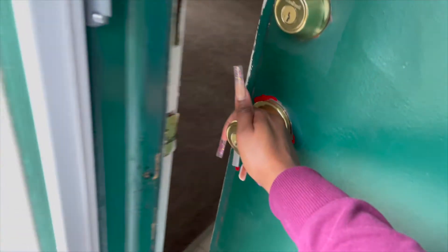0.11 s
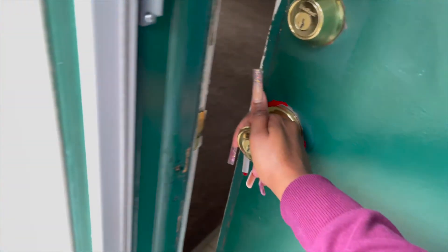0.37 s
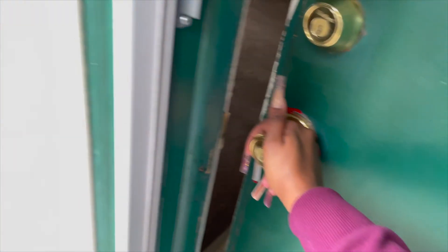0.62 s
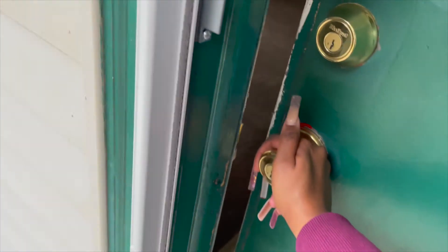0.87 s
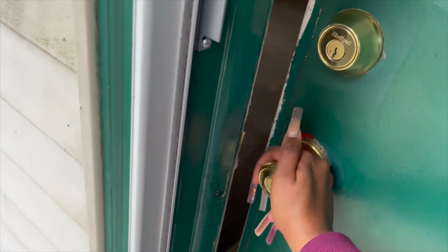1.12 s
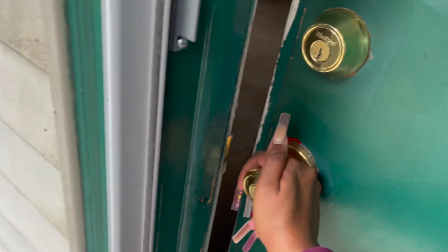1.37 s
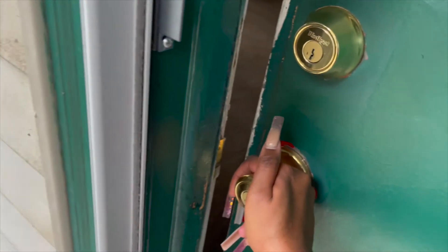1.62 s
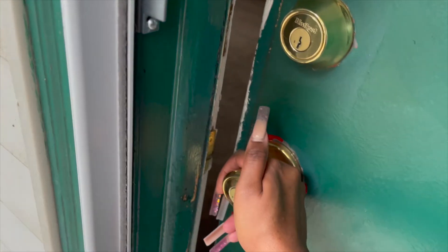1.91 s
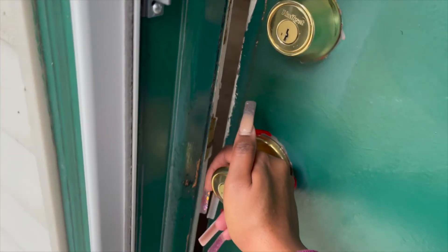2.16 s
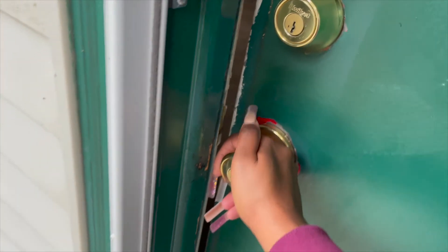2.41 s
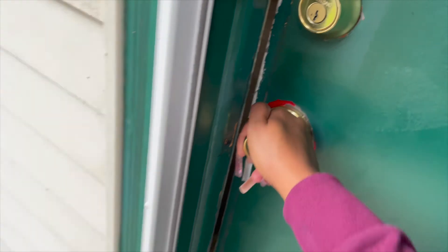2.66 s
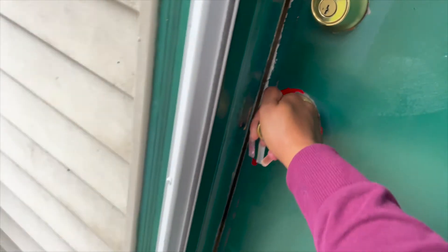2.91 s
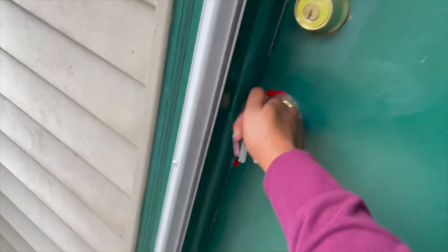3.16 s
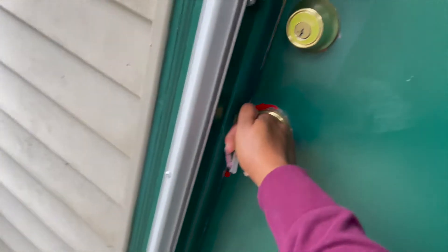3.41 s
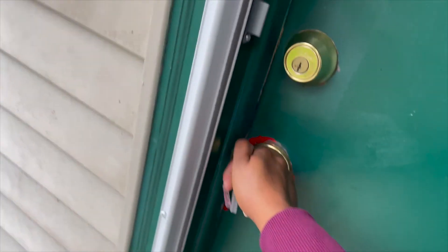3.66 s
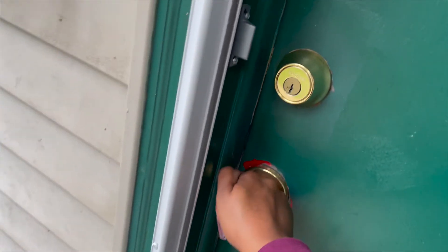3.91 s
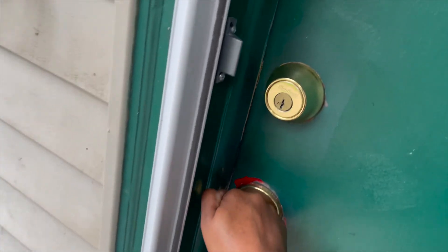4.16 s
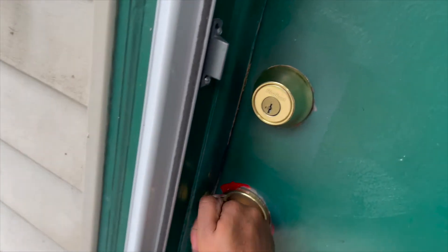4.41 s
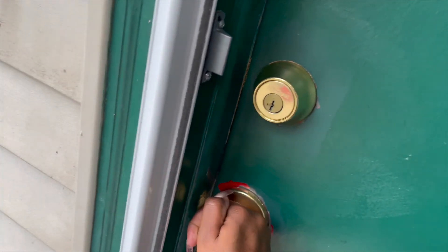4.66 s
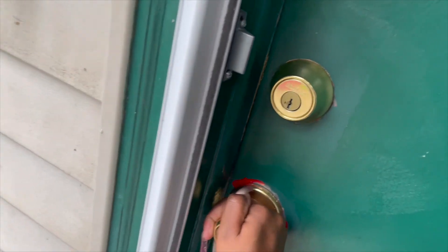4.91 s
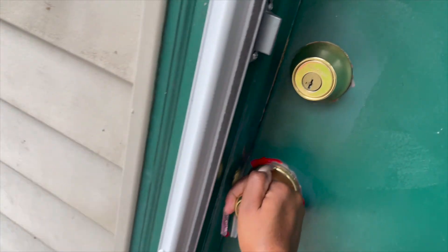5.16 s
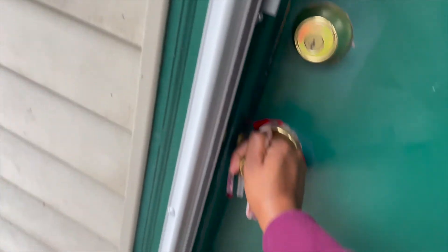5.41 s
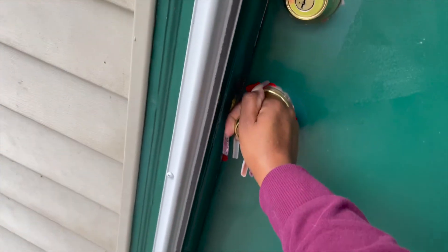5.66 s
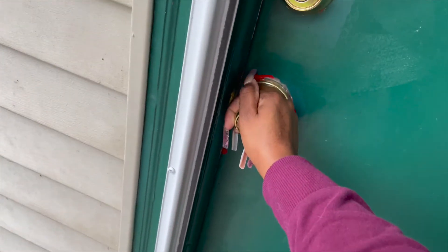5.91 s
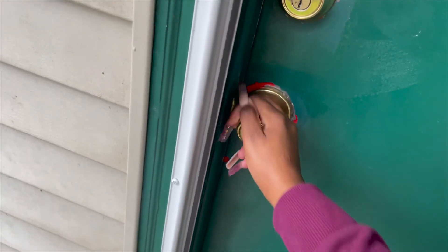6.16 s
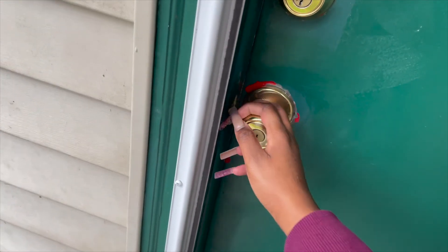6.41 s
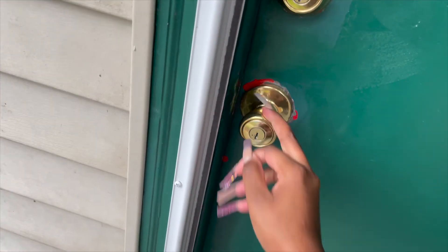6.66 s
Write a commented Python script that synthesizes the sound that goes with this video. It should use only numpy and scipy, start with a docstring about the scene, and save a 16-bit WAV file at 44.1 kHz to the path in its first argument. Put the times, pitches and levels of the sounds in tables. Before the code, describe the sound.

A front door creeps nearly shut with faint taps, slams with one heavy booming thud and metallic clack, then its loose knob rattles and clicks.

```python
"""On a porch by a quiet street, a hand pulls a front door shut by its loose brass knob, heard close by.
Slab, panel, knob and brass are modal bodies: noise shaped by contact and rubbing forces excites them.
Dying low sines are the booms of the slab, gliding sines a hinge squeak and low moans,
and filtered noise the street; a pair of phone microphones shares its treble."""
import sys
import numpy as np
from scipy import signal
from scipy.io import wavfile

SR = 44100
rng = np.random.default_rng(int(sys.argv[2]) if len(sys.argv) > 2 else 0)


def magnitude_from_level(level_db):
    """Linear magnitude for a level in decibels (20 dB per decade)."""
    exponent = np.asarray(level_db, float) / 20
    return 10 ** exponent


def persist_wave(psi):
    """Save psi, clipped to +-1, as 16-bit WAV."""
    counts = np.round(np.clip(psi, -1, 1) * 32767).astype(np.int16)
    wavfile.write(sys.argv[1], SR, np.atleast_2d(counts).T)


N = 299880

# Levels are in dB; the door's parts and booms add gains of their own.
# Traffic rumble. Each row: time in seconds, level in dB.
TRAFFIC_RUMBLE = [(0, -46), (.9, -44), (1.5, -48), (1.76, -44.5), (2.1, -45.5), (3.6, -37.5), (4.0, -41),
                  (4.75, -43), (5.04, -34.5), (5.3, -47.5), (6.5, -44.5), (6.8, -43)]
# Steady street spectrum. Each row: frequency in Hz, level in dB per Hz.
STREET_SPECTRUM = [(95, -82.5), (134, -68.5), (185, -86), (238, -74), (356, -79), (546, -79), (640, -91.5),
                   (750, -87), (1200, -100), (1700, -104.5), (2800, -107.5), (3700, -109), (4600, -107),
                   (5800, -104)]
# Left-right correlation of the street. Each row: frequency in Hz, likeness from -1 to 1.
STREET_LIKENESS = [(40, 0.99), (110, 0.71), (210, 0.43), (400, -0.63), (1000, -0.34)]
# Low gliding tones. Each row: start in seconds, length in seconds, pitch in Hz,
# pitch factor at mid-way, level in dB.
LOW_MOANS = [(4.36, 0.362, 157, 1.38, -50.5), (5.449, 0.41, 126, 1.3, -49.5)]
# Hinge squeak. One row: start in seconds, length in seconds, pitch in Hz, pitch factor at mid-way, level in dB.
HINGE_SQUEAK = (1.12, .25, 1695, 1.006, -75)
# Lowest swings of the slab and the air behind it. Each row: start in seconds, level in dB,
# frequency in Hz, 60 dB decay time in seconds.
SLAB_BOOMS = [(.0, -33.5, 70.3, 0.19), (0.149, -37, 74, 0.14), (0.209, -29, 71.9, 0.31),
              (2.172, -21.5, 33.2, 0.28), (2.211, -14, 33.77, 0.64), (2.212, -25.5, 66.2, 0.98),
              (2.347, -17.5, 37.1, 0.52), (2.402, -20, 28.2, 0.54), (2.913, -15.5, 36.9, 0.54),
              (2.968, -8.5, 42.3, 0.036), (3.013, -15.5, 33.9, 0.35), (3.117, -0.5, 46.3, 0.37),
              (3.141, -16.5, 92.5, 0.52), (3.201, -5.5, 28.23, 0.6), (3.241, -15.5, 57, 0.55),
              (3.274, -20, 25.3, 0.96), (3.371, -22, 29.3, 1.18), (3.50, -20, 34, 0.36),
              (6.531, -23.5, 54.4, 0.21)]
# Strokes of hand, seal and latch. Each row: start in seconds, length in seconds, level on the knob in dB,
# panel above knob in dB, brass above knob in dB.
RUB_STROKES = [(0, 0.063, -61.5, 0, -0.5), (1.566, 0.21, -70, 13.5, -7.5), (1.802, 0.11, -61, 6.5, -21),
               (1.96, 0.095, -65, 10, -3.5), (2.792, 0.17, -74.5, 8, -3), (2.922, 0.096, -69, 15, -3),
               (2.989, 0.1, -57.5, 8.5, 2), (3.093, 0.14, -42, 11, -1), (3.499, 0.16, -72.5, 16, -17),
               (3.852, 0.13, -74, -5, -0.5), (4.198, 0.25, -75, 9, -2), (4.4, 0.061, -60, 4, -24),
               (4.51, 0.1, -70.5, 11, -15), (4.677, 0.095, -68, 4.5, -6.5), (4.967, 0.035, -66.5, 0, -24),
               (5.274, .1, -70.5, 5, -8), (5.377, .11, -60.5, 4.5, -6.5), (5.716, .06, -59, -1, -3),
               (5.751, 0.13, -54, 8.5, 0), (5.877, 0.087, -61.5, 10.5, -3), (6.078, 0.16, -67, 8, -4),
               (6.203, 0.11, -63, 4, -5.5), (6.322, 0.083, -74, 5, 3.5), (6.499, 0.04, -62.5, 9.5, 0),
               (6.66, 0.051, -59.5, -18, -9)]
# Knocks of the slab on its frame. Each row: time in seconds, peak level in dB, ring in Hz,
# 60 dB decay time of the rattling tail in seconds.
FRAME_KNOCKS = [(0.151, -26.5, 156, 0.055), (0.16, -37, 200, .15), (0.166, -29, 285, 0.17),
                (0.623, -32.5, 220, 0.39), (0.967, -41, 136, 0.12), (2.162, -32.5, 300, 0.16),
                (2.201, -27.5, 139, 0.39), (2.274, -34.5, 254, .12), (3.033, -16.5, 428, 0.26),
                (3.094, -13, 300, .15), (3.114, -11, 343, 0.4), (3.151, -4, 332, 0.12),
                (3.16, -4.5, 195, 0.16), (3.176, -11, 175, 0.096), (3.183, -8.5, 124, 0.077),
                (3.244, -14.5, 191, 1), (3.752, -34.5, 326, 0.4), (3.789, -43, 214, .15),
                (4.282, -37, 200, 0.56), (4.504, -32, 307, .15), (4.885, -35.5, 286, .12),
                (5.902, -35, 273, .13), (6.501, -36.5, 200, 0.18), (6.531, -32, 130, 0.17)]
# Contacts of knob, latch and frame. Each row: time in seconds, peak level on the knob in dB,
# panel above knob in dB, brass above knob in dB.
LATCH_CONTACTS = [(0.15, -57, 12, 8), (0.624, -51, 21, -9), (0.658, -51, 11, 1), (2.131, -57, 10.5, -6),
                  (2.159, -38, 7, -15), (2.2, -42.5, 9.5, 0.5), (2.279, -38.5, 6, -14.5),
                  (2.309, -46, 5.5, -1), (2.552, -49, 1.5, -9.5), (2.887, -31.5, -4.5, -0.5),
                  (2.929, -44, -12, -30), (3.033, -13.5, 1, 3), (3.042, -16.5, 2.5, -6.5),
                  (3.164, -14, 3, 0), (3.174, -14.5, 6, 1), (3.188, -13, 0.5, -16), (3.197, -15, -7.5, -5),
                  (3.213, -17.5, 7.5, -9), (3.241, -21, -7.5, -10.5), (3.311, -35, 7.5, -7),
                  (3.335, -34, 14.5, -18.5), (3.356, -34.5, 0, -6.5), (3.422, -43, 3, 4.5),
                  (3.512, -49.5, 4, -8), (3.526, -40, -4, -25), (3.548, -57, 17, -15),
                  (3.605, -41, -4, -12.5), (3.731, -47, 5.5, 5), (3.757, -36, 9.5, -4.5),
                  (3.78, -46, -10, -2), (4.19, -56.5, 4, 0.5), (4.284, -57.5, 22, 4), (4.407, -43.5, 14, 1),
                  (4.503, -35, 0.5, -5.5), (4.612, -36, 4, -23), (4.644, -32.5, -10, -16),
                  (4.8, -55, 0.5, -17), (4.88, -36, 2, -37), (4.915, -58, 11, -13), (4.942, -44, 3.5, -14),
                  (5.014, -48, 1.5, -23.5), (5.225, -46, -2, -13), (5.652, -59, 8.5, -16),
                  (5.706, -41.5, 0, 0.5), (5.904, -47.5, 8, -17), (5.955, -40.5, 13, 0),
                  (6.036, -52.5, 14.5, 0.5), (6.198, -31, -1, -6.5), (6.41, -47.5, 1, -11),
                  (6.453, -49, 13, -18), (6.501, -40, 5, -0.5), (6.522, -58, 32.5, 18), (6.532, -55, 19, 5),
                  (6.673, -35.5, -20, -16), (6.69, -23.5, -7.5, 12.5), (6.699, -26, -16, 11.5)]
# Ringing modes of the four parts. Each row: frequency in Hz, width in Hz (held to 8-400), level in dB.
SLAB_MODES = [(135.4, 8.7, 10.5), (201.9, 7.9, 6.5), (258, 21, -5), (333.6, 5.3, -2), (385, 6, -14.5),
              (520, 13, -8)]
PANEL_MODES = [(721, 39, -5), (837, 11, -16.5), (927, 11, -8), (1036, 32, -11), (1135, 130, -3.5),
               (1305, 59, -2)]
KNOB_MODES = [(1770, 19, -0.5), (2258, 140, -7.5), (4070, 130, 2)]
BRASS_MODES = [(4427, 590, 2.5), (5427, 535, 3.5), (5060, 36, 4), (5500, 32, -17), (8180, 73, -1.5)]
# Pitches at which loose parts ring. Each entry: frequency in Hz.
LOOSE_PANEL_HZ = [878.5, 1015, 1148, 1290]
LOOSE_KNOB_HZ = [1986, 2272, 2490, 2890, 3770]
LOOSE_BRASS_HZ = [4543, 4740, 5400, 5630]
# Resonances of both microphone ports. Each row: frequency in Hz, width in Hz, lift in dB.
PORT_RESONANCES = [(3576, 1100, -3), (5060, 370, 3.5)]
# Further resonances of the left port. Each row: frequency in Hz, width in Hz, lift in dB.
LEFT_RESONANCES = [(990, 655, 5), (2960, 1010, 5)]

# A stroke's edges change by 10 dB in these times; the exponent below 1 puts its swell before the middle.
RUB_RISE_S, RUB_FALL_S, RUB_SWELL_DB, RUB_EARLY = 0.028, 0.03, 6, 0.71
TOUCH_S = 0.002  # build-up of a contact
RATTLE_T60_S = 0.11  # reference decay of the rattling tail, scaled for each part
# Reference shaking relative to the peak; the parts scale both, and CHATTER_DB makes it uneven.
SHAKE_DB, SHAKE_T60_S, CHATTER_DB = -9.5, 0.22, 3
SHAKE_FAINTER, SHAKE_LONGER = 0.25, 0.24  # a harder blow shakes relatively fainter but longer (dB per dB)
HISS_GROWTH = 0.25  # extra level of the hiss above 6.5 kHz (dB per dB of envelope)
LOOSE_SPREAD_DB = 4.5  # a blow catches each loose part more or less
SHARED_HZ, LAG_SAMPLES = 4330, 26  # shared treble: lower limit, delay on the left


def rms_one(x):
    """Normalization: the root mean square becomes 1."""
    return x / np.sqrt(np.mean(x ** 2) + 1e-20)


def at_hz(points, hz):
    """Linear interpolation of a spectrum along log frequency."""
    table_hz, values = np.transpose(points)
    return np.interp(np.log(hz), np.log(table_hz), values)


def cut(x, hz, kind, order=2):
    """Butterworth filtering: maximally flat passband."""
    return signal.sosfilt(signal.butter(order, hz, kind, fs=SR, output="sos"), x)


def resonance(x, hz, width_hz):
    """Damped resonator: a two-pole band-pass with gain 1 at its peak."""
    r = np.exp(-np.pi * width_hz / SR)
    numerator = [(1 - r * r) / 2, 0, (r * r - 1) / 2]
    return signal.lfilter(numerator, [1, -2 * r * np.cos(2 * np.pi * hz / SR), r * r], x)


def lift(x, resonances):
    """Resonant amplification: each resonance in turn raises or lowers its surroundings."""
    for hz, width_hz, lift_db in resonances:
        x = x + (magnitude_from_level(lift_db) - 1) * resonance(x, hz, width_hz)
    return x


def drift(rate_hz):
    """Random fluctuation: low-passed noise of rms 1, drawn 40 times a second."""
    points = rng.standard_normal(int(N / SR * 40) + 2)
    r = np.exp(-2 * np.pi * rate_hz / 40)
    smooth = rms_one(signal.lfilter([1], [1, -r], points))
    return np.interp(np.arange(N) * 40 / SR, np.arange(len(points)), smooth)


def spread(mid, side, alike):
    """Partial correlation: sum and difference noises are weighted by left-right likeness."""
    return np.sqrt(1 + alike) * mid + np.sqrt(1 - alike) * side * [[1], [-1]]


def stereo(alike, grain_db):
    """Granular noise: uneven grains modulate two partly correlated channels."""
    mid, side = rng.standard_normal((2, N))
    grains = magnitude_from_level(grain_db * np.minimum(rng.exponential(1, N), 4))
    return rms_one(grains * spread(mid, side, alike))


def street():
    """Band-filtered noise: flickering third octaves, the lowest swelling with passing traffic."""
    out, edges = 0, 16 * 2 ** np.arange(0, 9, 1 / 3)
    traffic_db = np.interp(np.arange(N) / SR, *np.transpose(TRAFFIC_RUMBLE))
    white = rng.standard_normal((2, 2, N))  # neighbouring bands take separate noises
    for k, (low, high) in enumerate(zip(edges, edges[1:])):
        mid, side = rms_one(cut(white[k % 2], [low, high], "band"))
        hz = np.sqrt(low * high)
        if hz < 45:
            level_db = traffic_db - 4.0
        elif hz < 95:
            level_db = -52.5 + 0.3 * (traffic_db - traffic_db.mean())
        else:
            level_db = at_hz(STREET_SPECTRUM, hz) + 10 * np.log10(high - low)
        band = spread(mid, side, at_hz(STREET_LIKENESS, hz))
        out = out + magnitude_from_level(level_db + 2.7 * drift(1.8)) * band
    return cut(out, 5420, "low", order=12)


def glide(start, length, hz, rise, level_db):
    """Frequency modulation: a thin tone of wavering level arches in pitch, faded at both ends."""
    t = np.arange(N) / SR - start
    fade = np.clip(np.minimum(t, length - t) / 0.05, 0, 1)
    pitch = hz * rise ** np.sin(np.pi * np.clip(t / length, 0, 1))
    tone = np.sin(2 * np.pi * np.cumsum(pitch) / SR)
    return np.sqrt(2) * fade * magnitude_from_level(level_db + 2.2 * drift(10)) * tone


def hinge_squeak():
    """Tonal squeak: the hinge sounds as a single gliding sine."""
    return glide(*HINGE_SQUEAK)


def moans():
    """Superposition of low gliding tones."""
    return sum(glide(*moan) for moan in LOW_MOANS)


def booms():
    """Damped oscillation: low sines with sharpened crests, arriving at the right port first."""
    out = np.zeros(N)
    for s, level_db, hz, t60 in SLAB_BOOMS:
        t = np.maximum(np.arange(N) / SR - s, 0)
        turn = 2 * np.pi * hz * t
        crest = 0.076 * np.sin(turn / 2) ** 2 * np.sin(2 * turn - 0.8)
        out += magnitude_from_level(level_db - 60 * t / t60) * (np.sin(turn) + crest)
    out = cut(out, 250, "low")
    late = np.interp(np.arange(N) - 0.0012 * SR, np.arange(N), out)
    return np.array([late * magnitude_from_level(0.5), out * magnitude_from_level(3.5)])


def strokes():
    """Stick-slip friction: levels in dB on knob, panel and brass rise, swell and fall unevenly."""
    power, t = np.full((3, N), 1e-12), np.arange(N) / SR
    for start, length, knob_db, panel_db, brass_db in RUB_STROKES:
        edge = np.minimum(0, np.minimum((t - start) / RUB_RISE_S, (start + length - t) / RUB_FALL_S))
        swell = np.sin(np.pi * np.clip((t - start) / length, 0, 1) ** RUB_EARLY)
        part_db = np.array([[0], [panel_db], [brass_db]])
        power += magnitude_from_level(knob_db + 10 * edge + RUB_SWELL_DB * swell + part_db) ** 2
    slips = rms_one(cut(rng.standard_normal(N), [12, 90], "band"))
    return 10 * np.log10(power) + 1.37 * slips


def shake_time(level_db):
    """Level-dependent decay: 60 dB time in seconds, longer after a harder blow."""
    return SHAKE_T60_S * magnitude_from_level(SHAKE_LONGER * (level_db + 42.5))


def force(times, levels_db, t60s, rub_db, crack_s, tail_db, shake_db, shake_t60s):
    """Impact excitation: crack, rattling tail and uneven shaking add in an envelope to the rubbing."""
    power = magnitude_from_level(rub_db) ** 2
    chatter_db = CHATTER_DB * rms_one(cut(rng.standard_normal(N + SR), [15, 120], "band"))
    for s, level_db, t60, shake_t60 in np.broadcast(times, levels_db, t60s, shake_t60s):
        i = round(s * SR)
        t = np.arange(min(N - i, SR)) / SR
        crack = np.exp(-t / crack_s)
        tail = magnitude_from_level(tail_db - 60 * t / np.clip(t60, 0.02, 1))
        start_db = shake_db - SHAKE_FAINTER * (level_db + 41)
        shake = magnitude_from_level(start_db - 60 * t / shake_t60 + chatter_db[i:i + len(t)])
        touch = np.minimum(t / TOUCH_S, 1)
        power[i:i + len(t)] += magnitude_from_level(level_db) ** 2 * ((crack + tail) ** 2 + shake ** 2) * touch ** 2
    return np.sqrt(power)


def click(times, levels_db):
    """Impulse excitation: the first touch of each contact, alike at both ports."""
    out = np.zeros(N)
    out[np.round(times * SR).astype(int)] = magnitude_from_level(levels_db)
    return out


def body(drive, low_hz, high_hz, modes, ring_db):
    """Modal response: a broad band of dense modes and any that ring out of it."""
    out = cut(drive, [low_hz, high_hz], "band", order=4)
    for hz, width_hz, level_db in modes:
        out = out + magnitude_from_level(ring_db + level_db) * resonance(drive, hz, np.clip(width_hz, 8, 400))
    return out * np.sqrt(SR / 2 / (high_hz - low_hz))


def rings(times, levels_db, pitches_hz, cycles_at_1khz, phase_spread):
    """Free damped vibration: one brief ring a blow, with random phases (radians) at the two ports."""
    out, phases = np.zeros((2, N)), phase_spread * rng.standard_normal((len(times), 2))
    for s, level_db, hz, phase in zip(times, levels_db, pitches_hz, phases):
        i = round(s * SR)
        t = np.arange(min(N - i, SR // 5)) / SR
        decay = np.exp(-t * np.sqrt(hz * 1000) / cycles_at_1khz)
        shape = decay * np.minimum(t / TOUCH_S, 1)
        out[:, i:i + len(t)] += magnitude_from_level(level_db) * shape * np.sin(2 * np.pi * hz * t + phase[:, None])
    return out


def loose(times, levels_db, pitches_hz, cycles_at_1khz):
    """Shock excitation: every contact rings all the given loose parts, each with a strength of its own."""
    unevenness = rng.standard_normal((len(times), len(pitches_hz)))
    caught_db = levels_db[:, None] + LOOSE_SPREAD_DB * unevenness
    return sum(rings(times, caught_db[:, k], np.full(len(times), hz), cycles_at_1khz, 1.36)
               for k, hz in enumerate(pitches_hz))


def slab(s, level_db, t60, rub_db):
    """Plate impact: knocks on the frame and rubbing excite the low modes."""
    envelope = force(s, level_db, t60, rub_db + 1.5, 0.014, -4.0, SHAKE_DB - 7.5, shake_time(level_db))
    return magnitude_from_level(-17) * body(envelope * stereo(0.34, 3.6), 92, 580, SLAB_MODES, 9.8)


def panel(s, level_db, rub_db, shake_s):
    """Plate vibration: contacts and rubbing excite the middle modes."""
    envelope = force(s, level_db, 1.68 * RATTLE_T60_S, rub_db + 9.5, 0.0045, -1.5,
                     SHAKE_DB - 2.0, 1.1 * shake_s)
    drive = envelope * stereo(0.12, 3.0) + click(s, level_db + 4.5)
    return magnitude_from_level(-13.5) * body(drive, 536, 1326, PANEL_MODES, 3.94)


def knob(s, level_db, rub_db, shake_s):
    """Resonance of a small body: short cracks and rubbing excite the knob."""
    envelope = force(s, level_db, RATTLE_T60_S, rub_db + 10.0, 0.00088, -1.0, SHAKE_DB, 0.93 * shake_s)
    drive = envelope * stereo(0.05, 2.8) + click(s, level_db + 4.5)
    return magnitude_from_level(-10.5) * body(drive, 1253, 3460, KNOB_MODES, 0.95)


def brass(s, level_db, rub_db, shake_s):
    """Dynamic brightness: high modes and a thin hiss above 6.5 kHz, growing faster than the envelope."""
    envelope = force(s, level_db, 1.21 * RATTLE_T60_S, rub_db + 6.5, 0.002, -7.5,
                     SHAKE_DB - 3.5, 0.89 * shake_s)
    drive = envelope * stereo(0.77, 4.3) + click(s, level_db + 16.5)
    hiss = body(drive * envelope ** HISS_GROWTH, 6500, 9800, [], 0)
    return magnitude_from_level(-15.0) * body(drive, 3710, 6140, BRASS_MODES, 9.24) + magnitude_from_level(-2) * hiss


def door():
    """Common excitation: knocks, contacts and rubbing excite the four parts; contacts also ring the loose ones."""
    s, knob_db, panel_above_db, brass_above_db = np.transpose(LATCH_CONTACTS)
    panel_db, brass_db = knob_db + panel_above_db, knob_db + brass_above_db
    knock_s, knock_db, knock_hz, knock_t60 = np.transpose(FRAME_KNOCKS)
    shake_s = shake_time(panel_db)  # the harder the panel is struck, the longer panel, knob and brass shake
    rub_knob_db, rub_panel_db, rub_brass_db = strokes()
    parts = (slab(knock_s, knock_db, knock_t60, rub_panel_db) + panel(s, panel_db, rub_panel_db, shake_s)
             + knob(s, knob_db, rub_knob_db, shake_s) + brass(s, brass_db, rub_brass_db, shake_s))
    loose_parts = (loose(s, panel_db - 13.5, LOOSE_PANEL_HZ, 8.5) + loose(s, knob_db - 16, LOOSE_KNOB_HZ, 8.0)
                   + loose(s, brass_db - 9.5, LOOSE_BRASS_HZ, 6.1))
    return parts + loose_parts + rings(knock_s, knock_db - 0.5, knock_hz, 5.55, 0.29)


def scene():
    """Superposition of door, booms, street and tones in two channels."""
    return door() + booms() + street() + hinge_squeak() + moans()


def top_cut(x):
    """Nothing passes above the cut-off."""
    return signal.sosfilt(signal.butter(12, 10160, fs=SR, output="sos"), x)


def record(dry):
    """Port resonance and shared treble: the right's treble serves both, late and inverted on the left."""
    left, right = lift(dry, PORT_RESONANCES)
    left = lift(left, LEFT_RESONANCES)
    treble = cut(right, SHARED_HZ, "high", order=14)
    treble = np.array([-np.pad(treble, (LAG_SAMPLES, 0))[:N], treble])
    x = cut(np.array([left, right]), SHARED_HZ, "low", order=14) + magnitude_from_level(4.0) * treble
    # the top is dull: only a faint part passes above the low-pass
    x = cut(x, 5387, "low", order=10) + magnitude_from_level(-27.0) * cut(x, 3800, "high", order=4)
    x = cut(cut(x, 9440, "low", order=16), 20.1, "high")
    mix = 0.9 * np.tanh(x / 0.9)  # soft saturation
    return top_cut(mix)


dry = scene()
out = record(dry)
persist_wave(out)
```